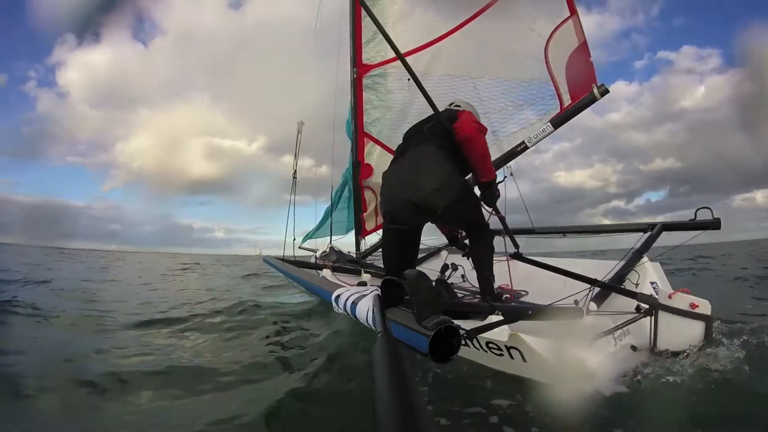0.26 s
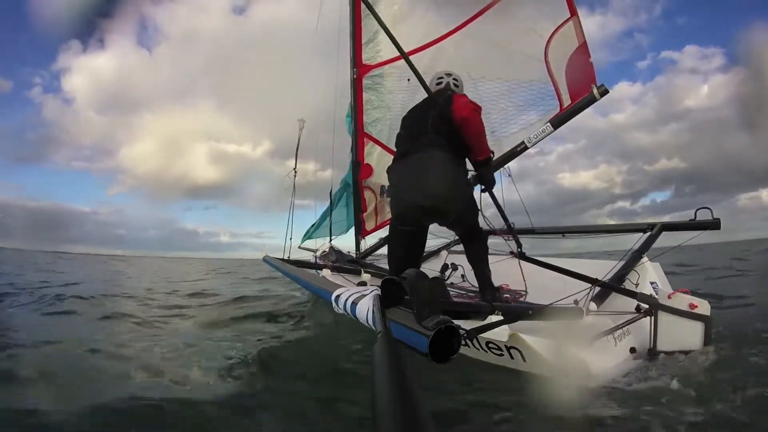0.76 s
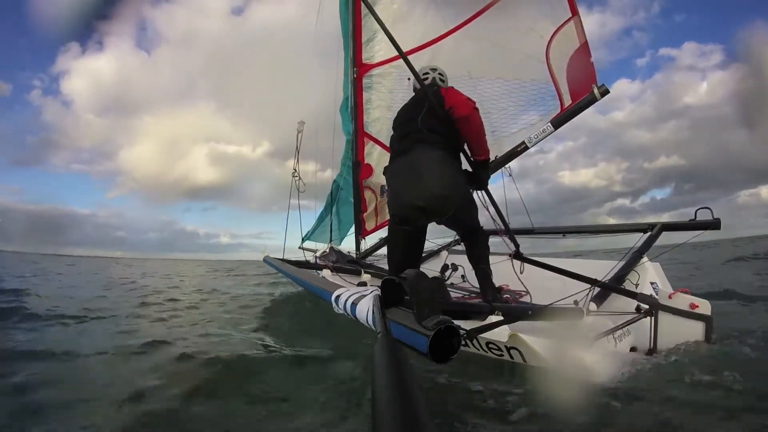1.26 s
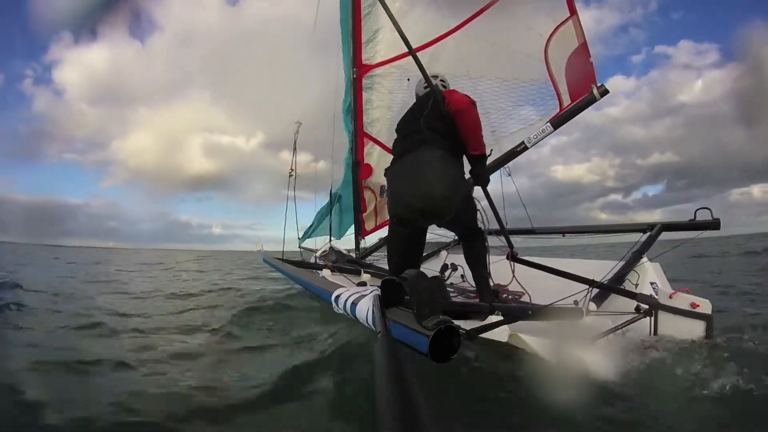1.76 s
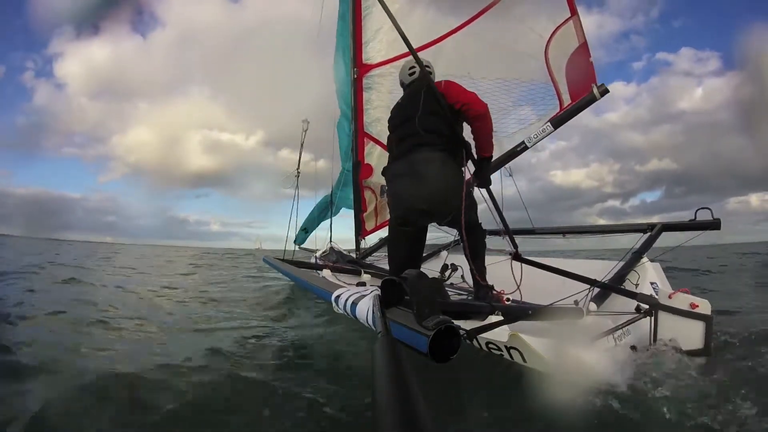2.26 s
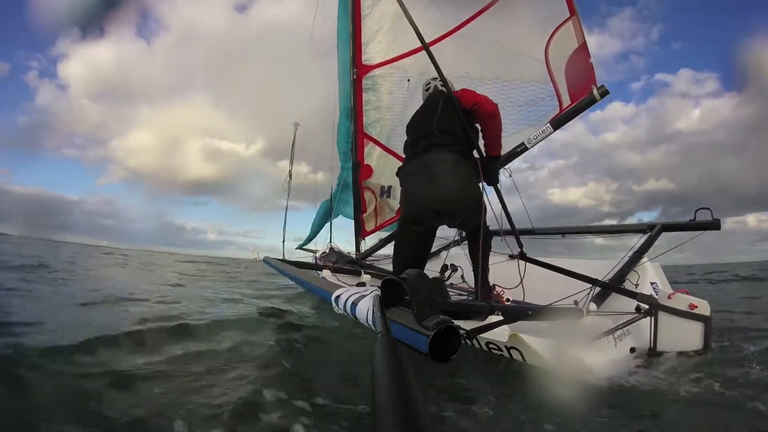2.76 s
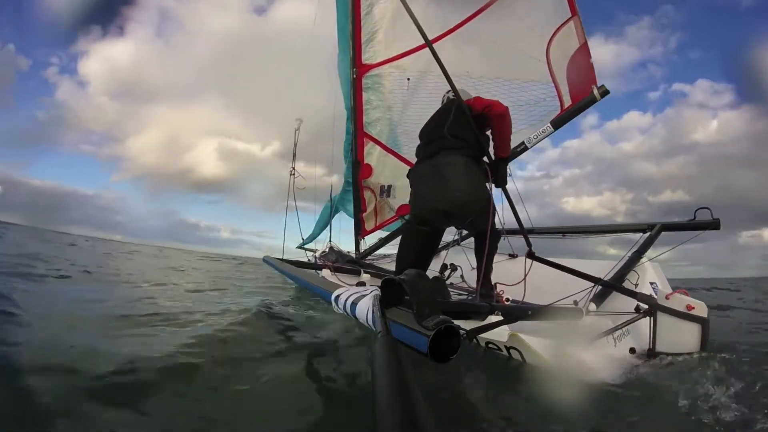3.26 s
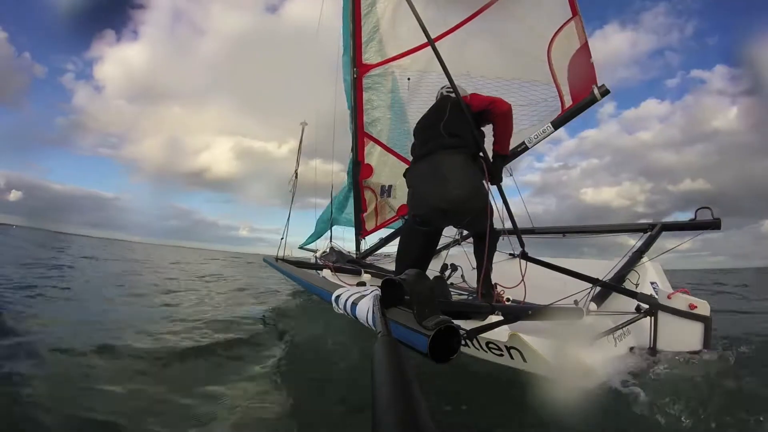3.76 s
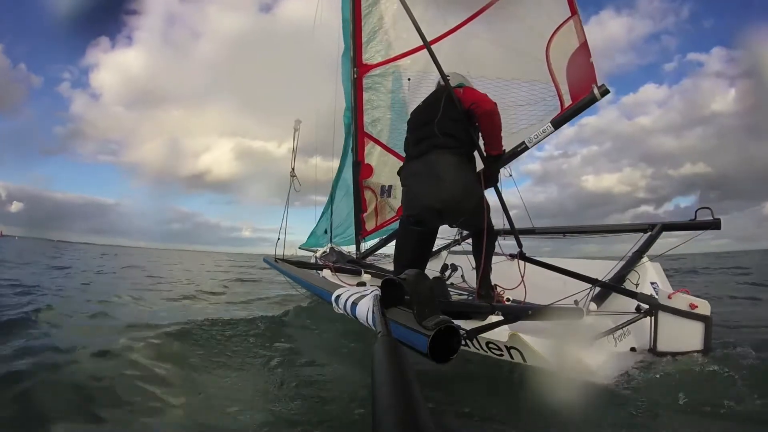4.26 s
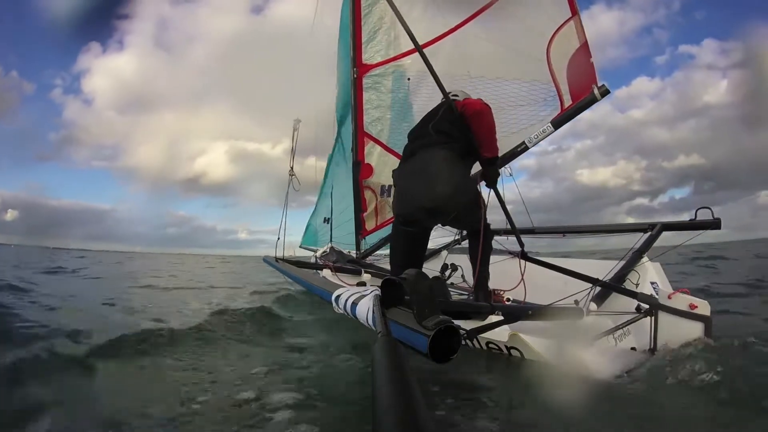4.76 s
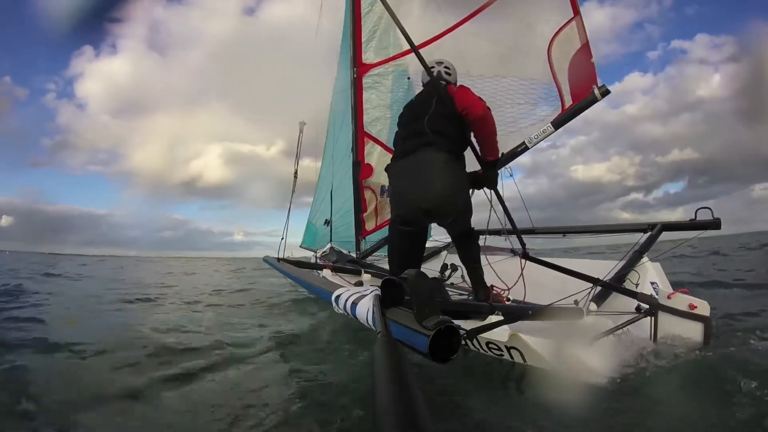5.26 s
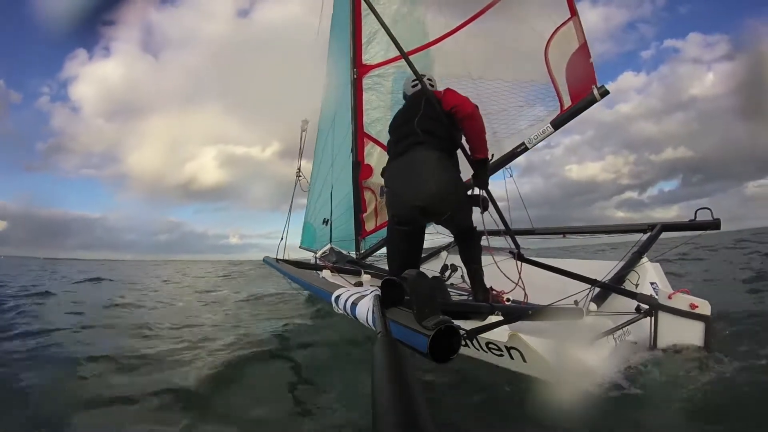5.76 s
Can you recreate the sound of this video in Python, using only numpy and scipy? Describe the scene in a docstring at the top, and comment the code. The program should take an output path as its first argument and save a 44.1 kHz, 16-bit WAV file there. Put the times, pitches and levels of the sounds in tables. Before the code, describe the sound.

Muffled, close and boomy: a low throbbing rumble from wind and jolts on the camera pole dominates. Over it, choppy water knocks and slaps against a hollow hull, with brief watery gushes, small ripples and faint bubbles. Dry clacks of blocks and shackles cut through, loudest at the start and near the end. Two bigger waves bring splashes and fine spray ticking on the housing; open water rushes softly behind.

```python
"""A low throbbing drone, with water washing and slapping along a hollow hull and rigging clacking above.
The place is a small sailing skiff in chop; the microphone is in a sealed camera housing on a stern pole.
The drone is the pole's lowest mode, swayed by wind and jolts; noise bursts through the hull's modes make
the water; struck fittings make the clacks. Twice a fine spray sizzles on the housing, close to the
microphone; bubbles, drops, small ripples and the distant rush of the sea lie behind."""
import sys
import numpy as np
from scipy import signal
from scipy.fft import rfft, irfft, next_fast_len
from scipy.io import wavfile
from scipy.ndimage import uniform_filter1d, map_coordinates

SR = 44100
rng = np.random.default_rng(int(sys.argv[2]) if len(sys.argv) > 2 else 0)


def transcribe(u):
    """Save the signal u as a 16-bit wav file named by the first command-line argument.

    u: samples, shape (n,) or (channels, n), limited to [-1, 1]; the rate is SR.
    q: integer samples, one column per channel.
    """
    v = np.clip(np.atleast_2d(u).T, -1, 1)
    q = np.round(v * 32767).astype(np.int16)
    wavfile.write(sys.argv[1], SR, q)


N = 265923
TIME = np.arange(N) / SR

# Levels in the tables are relative: the functions add trims, slow drift and the microphone's treble loss.
# wind shaking the pole: (time [s], level [dB])
WIND_LEVEL = [(0, -36.5), (0.1, -39.5), (0.52, -31), (0.62, -40), (1.0, -34), (1.2, -37), (1.5, -35.5),
              (1.75, -39.5), (2.1, -35.5), (2.4, -32.5), (2.72, -37.5), (2.95, -35), (3.15, -39),
              (3.95, -41.5), (4.3, -35), (4.42, -48), (4.55, -39.5), (4.8, -40), (5.0, -39.5), (5.4, -31.5),
              (5.7, -38.5), (6.03, -39)]
# gusts and lurches that jolt the pole: (time [s], level [dB], hold [s])
POLE_JOLTS = [(0.08, -21.5, 0.016), (0.167, -24.5, 0.017), (0.274, -27.5, 0.014), (0.44, -32.5, 0.017),
              (0.767, -20.5, 0.023), (0.88, -25, 0.012), (1.485, -29, 0.015), (2.268, -24.5, 0.02),
              (2.352, -22.5, 0.01), (2.526, -21, 0.019), (2.816, -26, 0.06), (3.702, -29, 0.018),
              (4.914, -23.5, 0.017), (5.07, -25.5, 0.022)]
# unpitched buffeting spectrum: (frequency [Hz], density [dB per Hz])
BUFFET_COLOUR = [(8, -22), (20, 4), (42, 0.5), (62, 6.5), (80, -5.5), (100, -25), (200, -32.5), (400, -55),
                 (1000, -120)]
# upper bending modes of the pole: (frequency [Hz], width [Hz], level [dB])
POLE_MODES = [(115.4, 13, 3.5), (150.3, 21.5, 1.5)]
# waves the hull runs through: (time [s], level [dB], hold [s], draining [dB per s], splash [dB re wave])
HULL_WAVES = [(0.622, -52, 0.15, 30, -5.5), (1.195, -54.5, 0.7, 21, -8.5), (1.88, -36.5, 0.085, 25, -2),
              (3.68, -56, 0.12, 49, -18), (5.061, -48, 0.18, 69, 0), (5.188, -44, 0.15, 70, 0)]
# modes of hull and housing: (frequency [Hz], width [Hz], level [dB])
HULL_MODES = [(326, 38, -11), (435, 33, -8.5), (488.2, 30.6, 3), (656, 36, -3), (718, 51, -10.5),
              (838, 32.5, -2), (904, 75, -9.5), (1038, 33, -6), (1133, 93, -3.5), (1460, 200, -7.5),
              (1666, 95, -1), (1785, 39, -3), (2127, 40, -4), (2497, 450, -8), (2720, 127, -2)]
# waves slapping the hull:
# (time [s], level [dB], splash [dB], t60 [s], air pocket [Hz], thud [dB])
HULL_SLAPS = [(0.789, -28.5, -7.5, 0.18, 630, 1), (0.836, -35, -9, 0.23, 860, 13.5),
              (1.1, -44, -20, 0.097, 560, 9), (1.182, -42.5, -6, 0.11, 463, 3),
              (1.229, -37, -5, 0.14, 800, 15), (1.506, -43.5, 5, 0.12, 520, 0),
              (1.864, -22, -5, 0.052, 655, -2), (1.872, -23.5, -16, 0.09, 1070, 2.5),
              (2.022, -25.5, -28, 0.12, 574, 7.5), (2.079, -36.5, -24, 0.44, 725, 13),
              (2.18, -34, -4, 0.092, 659, 0), (2.216, -25.5, -1.5, 0.064, 580, 6),
              (2.385, -29.5, -4, 0.085, 510, -3), (2.523, -30.5, -4, 0.099, 480, 10),
              (2.66, -41, -14, 0.17, 420, 7), (2.828, -31.5, -22, 0.089, 564, -2),
              (3.59, -42.5, -9, 0.049, 420, 0), (3.668, -38.5, 5.5, 0.13, 517, 1),
              (3.728, -45, 3, 0.06, 620, -2), (3.772, -35.5, -5.5, 0.088, 473, 1),
              (3.963, -42.5, -10, 0.074, 487, 11), (4.074, -33.5, -26, 0.1, 440, 4),
              (4.79, -50, 3, 0.06, 480, 11), (4.914, -43, -13, 0.12, 496, -5),
              (5.079, -20, -7.5, 0.077, 647, -4), (5.394, -35, -1.5, 0.15, 479, -7),
              (5.431, -33, -17, 0.13, 544, 3), (5.492, -29.5, -11, 0.062, 466, 4),
              (5.812, -33.5, -21, 0.11, 950, -1), (5.908, -41, -3, 0.026, 500, 10),
              (6.012, -27, -4, 0.11, 525, -4)]
# first contact of a slap, spectrum: (frequency [Hz], level [dB])
CONTACT_COLOUR = [(1500, -34), (2800, 8), (3600, -10), (4500, 5.5), (5200, -9.5), (5800, -7), (9000, -23),
                  (15000, -34)]
# blocks and shackles of the rigging clacking:
# (time [s], level [dB], thud [dB], edge [dB], rattle [dB], fall of the ringing tail [octaves per s])
RIGGING_CLACKS = [(0.0232, -7.5, -4.5, -23, -6.5, 76), (0.0443, -24, 1, -1.5, 3.5, 10.5),
                  (0.28, -41.5, -24, -32, 4, 8.9), (0.5166, -27, -5, -7.5, -2.5, 19),
                  (0.6453, -43.5, 11, 9, 0, 25), (0.6852, -42.5, -11, -17, -3, 20),
                  (0.988, -24.5, -5.5, -10, -0.5, 25), (1.747, -38, 17, -9, 0.5, 33),
                  (2.3157, -39, -9, -14, 3, 30), (2.367, -36, -4, -2, -1, 18), (2.386, -29, -5, -14, 2, 20),
                  (2.501, -36, -1, -6, 3, 31), (2.592, -36.5, -3, -28, -3.5, 48),
                  (2.8117, -27.5, -2, -13, -3, 48), (2.827, -32, -2, -11, 2, 70),
                  (2.860, -32, 0, -10, -1, 20), (2.876, -24, -7, -9, -1, 17), (3.3281, -33, -7, -11, 7, 20),
                  (3.8462, -36, 2, -7, -1.5, 50), (4.039, -42.5, -8, -17, 3, 20),
                  (4.258, -43.5, -7, -12, 5, 18), (5.284, -30.5, -5, -25, -7, 20),
                  (5.6283, -41, 4, -2, -2, 35), (5.807, -19, 0.5, -24, -5.5, 75)]
# broad spectrum of a clack: (frequency [Hz], level [dB])
CLACK_SPECTRUM = [(100, -42), (220, -44), (330, -18), (1700, -23.5), (2020, -38), (2400, -21.5),
                  (2950, -26), (4300, -43.5), (9000, -67)]
# what the fittings ring with: (frequency [Hz], half width [Hz], level [dB])
FITTING_MODES = [(482, 44, -10), (650, 29, -15.5), (1040, 97, -19), (1160, 104, -11.5), (1315, 28, -15),
                 (1486, 79, -5), (1662, 106, -0.5), (1808, 94, -1.5), (2136, 84, -13), (2380, 150, -22.5),
                 (2765, 114, -17), (3120, 130, -33.5), (3450, 43, -29), (4130, 59, -60)]
# single bubbles in the wake: (time [s], level [dB], starting pitch [Hz])
WAKE_BUBBLES = [(0.565, -46.5, 1430), (0.718, -48, 2040), (0.92, -50, 1860), (1.09, -54, 1510),
                (1.476, -53, 2100), (3.952, -49, 2110)]
# sheets of spray thrown by the two big waves: (time [s], level [dB], hold [s])
SPRAY_SHEETS = [(1.855, -62, 0.14), (5.055, -67, 0.36)]
# small drops on the housing: (time [s], level [dB])
HOUSING_DROPS = [(0.332, -59), (0.684, -58), (0.7033, -58), (0.785, -60), (0.826, -59), (2.2188, -56),
                 (3.054, -65), (5.083, -67), (5.63, -62)]
# thin shell of the housing: (frequency [Hz], width [Hz], level [dB])
SHELL_MODES = [(7400, 630, 5), (11050, 1500, -0.5), (12050, 300, 4), (13300, 400, -21), (14600, 790, -23)]
# rush of open water and wind, spectrum: (frequency [Hz], density [dB per Hz])
SEA_COLOUR = [(110, -31), (180, -2.5), (308, -6), (357, -6), (480, -2), (546, -7.5), (645, -9.5),
              (1400, -13), (1790, -14), (1960, -14.5), (2680, -17.5), (3610, -23), (15000, -42)]
# the wake streaming off the stern: (time [s], level [dB], fizz level [dB])
WAKE_LEVELS = [(0, -55, -63), (0.6, -57, -58.5), (1.3, -57, -64), (2.9, -58.5, -60.5), (3.1, -58.5, -66),
               (3.5, -58, -64.5), (3.9, -56.5, -60), (4.4, -58, -70.5), (4.6, -57, -62), (4.95, -56, -61.5),
               (5.6, -57, -62.5), (6.03, -54, -72)]

# pole: slopes of jolts and thumps, then its sway and the beat of two swing planes slightly out of tune
JOLT_RISE_DB_PER_S, JOLT_FALL_DB_PER_S, THUMP_FALL_DB_PER_S = 432, 237, 119
SWAY_HZ, SWAY_WANDER_HZ, FLUTTER_DB = 55.8, 3.67, 1
BEAT_HZ, BEAT_WANDER_HZ, BEAT_DEPTH = 8.2, 2.04, 0.67
SWAY_DB, BUFFET_DB = -3.5, -6  # beside the wind level
THUMP_DB, CLACK_THUMP_DB = -21, -4.5  # upper modes after a blow; clacks stir them less
UPPER_WIND_DB, UPPER_WAVE_DB = -20.5, -7.5  # wind and waves stir the upper modes
UPPER_DRAINS = 0.6  # share of the draining rate: the upper modes outlast the churn

# water
WAVE_RISE_DB_PER_S, SPLASH_RISE_DB_PER_S = 168, 294  # splash bursts out faster than churn builds
SPLASH_DRAINS = 2.7  # how much faster the splash dies than the churn
HULL_SHIFT = 0.021  # usual swing of the modes as water presses on the hull, in log pitch
SLAP_ATTACK_SHARE = 0.016  # of its t60: long slaps start softly
SLAP_DIRECT_DB = -15  # the part of a slap that passes between the hull's modes
POCKET_DB, POCKET_WIDTH = 8, 0.21  # air pocket resonance; width in log pitch
CRACK_DB, CRACK_T60_S = -16.5, 0.029  # first contact, beside the slap's splash
RIPPLE_DB, RIPPLE_SPREAD_DB, RIPPLE_HZ, RIPPLE_RISE_S = -52.5, 5, 900, 0.011
SPRAY_EDGE_DB_PER_S = 800  # spray sets in and stops abruptly
SIZZLE_PULSE_HZ, SIZZLE_PULSE_DEPTH = 85, 0.4

# rigging
RATTLE_RISE_S, RATTLE_T60_S = 0.0022, 0.05
ONSET_NOISE_DB, ONSET_NOISE_S = -21, 0.008  # faint noise around the strike, softening its onset
TAIL_DB, TAIL_T60_S, TAIL_HZ, TAIL_RISE_S = -12, 0.05, 1900, 0.0031  # faint ring; pitch at its start

TOP_HZ = 15250  # band limit at the microphone


def pole():
    """Wind and jolts sway and beat the pole's lowest mode amid buffeting; blows stir its upper modes."""
    wind = amp(curves(WIND_LEVEL)[0])
    phase = 2 * np.pi * np.cumsum(SWAY_HZ + SWAY_WANDER_HZ * wobble(24.19)) / SR
    beat = 2 * np.pi * np.cumsum(BEAT_HZ + BEAT_WANDER_HZ * wobble(8.5)) / SR
    flutter = unit((1 + BEAT_DEPTH * np.sin(beat)) * amp(FLUTTER_DB * wobble(17)))
    jolts = [swell(s, db, hold, JOLT_RISE_DB_PER_S, JOLT_FALL_DB_PER_S) for s, db, hold in POLE_JOLTS]
    drive = together([wind * flutter] + jolts)
    sway = amp(SWAY_DB) * drive * unit(np.sin(phase))

    buffet = unit(filtered(rng.standard_normal(N), colour(BUFFET_COLOUR)))
    buffeting = amp(BUFFET_DB) * wind * buffet

    upper_band = lambda f: resonances(POLE_MODES)(f) * above(f, 74) * (1 - above(f, 181))
    upper = unit(filtered(rng.standard_normal(N), upper_band))
    blows = [(s, db + thud_db) for s, db, *_, thud_db in HULL_SLAPS]
    blows += [(s, db + thud_db + CLACK_THUMP_DB) for s, db, thud_db, *_ in RIGGING_CLACKS]
    thumps = [swell(s, db + THUMP_DB, 0.0049, JOLT_RISE_DB_PER_S, THUMP_FALL_DB_PER_S) for s, db in blows]
    stir = together([amp(UPPER_WIND_DB) * wind, amp(UPPER_WAVE_DB) * flow(UPPER_DRAINS)] + thumps)
    return sway + buffeting + stir * upper


def wash():
    """Heavy churning water drives the hull's low modes, lighter and coarser splashes its high ones."""
    hull = resonances(HULL_MODES)
    churn_band = lambda f: hull(f) * above(f, 230) * (1 - above(f, 930))
    churn = filtered(patter(rate=6500, spread_db=0.5), churn_band)

    splash_top = lambda f: 1 - above(f, 2370) + amp(-25) * (1 - above(f, 6000))
    splash = filtered(patter(rate=2800, spread_db=1.5), lambda f: hull(f) * above(f, 520) * splash_top(f))
    splashing = together([swell(s, db + splash_db, hold, SPLASH_RISE_DB_PER_S, SPLASH_DRAINS * fall)
                          for s, db, hold, fall, splash_db in HULL_WAVES])

    lapping = amp(0.34 * wobble(25))
    churned = amp(-2.5) * flow() * patchy(churn, depth_db=1.5)
    return lapping * (churned + splashing * patchy(splash, depth_db=0.2))


def slaps():
    """A wave face cracks against the hull and traps air: a short noise burst rings pocket and hull."""
    out, t = np.zeros(N), np.arange(SR // 4) / SR
    crack_ring = causal(colour(CONTACT_COLOUR))
    for s, db, splash_db, t60, pocket_hz, thud_db in HULL_SLAPS:
        hull = hull_pressed(rng.uniform(-0.82, 1))
        attack = 1 - np.exp(-t / (SLAP_ATTACK_SHARE * t60))
        burst = rng.standard_normal(len(t)) * amp(-60 * t / t60) * attack

        pocket_db = lambda f: POCKET_DB * np.exp(-(np.log((f + 1) / pocket_hz) / POCKET_WIDTH) ** 2)
        body_db = lambda f: 0.98 * thud_db * (1 - above(f, 354)) + splash_db * above(f, 1200)
        dulling_db = lambda f: -21 * above(f, 2980) - 16 * above(f, 7000)
        tone = lambda f: amp(pocket_db(f) + body_db(f) + dulling_db(f))
        direct = lambda f: amp(SLAP_DIRECT_DB) * (1 - above(f, 1200))
        ring = causal(lambda f: np.hypot(np.abs(hull(f)), direct(f)) * above(f, 278) * tone(f))
        add(out, s - 0.001, signal.fftconvolve(burst, ring), db)

        crack = rng.standard_normal(len(t)) * amp(-60 * t / CRACK_T60_S) * (1 - np.exp(-t / 0.0029))
        add(out, s, signal.fftconvolve(crack, crack_ring), db + splash_db + CRACK_DB)
    return out


def clacks():
    """Fittings strike, rattle and ring; bending waves bring the highs down the pole first."""
    out, t = np.zeros(N), np.arange(SR // 6) / SR - 0.02  # the strike is at t = 0
    after = np.maximum(t, 0)
    peaks = lambda f: sum(amp(db) * np.exp(-((f - hz) / width) ** 2) for hz, width, db in FITTING_MODES)
    fitting = lambda f: colour(CLACK_SPECTRUM)(f) + peaks(f)
    dispersion = lambda f: np.exp(-2j * np.pi * 0.25 * np.sqrt(f))  # delays by 0.125 / sqrt(f) s
    for s, db, thud_db, edge_db, rattle_db, fall in RIGGING_CLACKS:
        rattle_gain = amp(-60 * after / RATTLE_T60_S) * (1 - np.exp(-after / RATTLE_RISE_S))
        rattle = rng.standard_normal(len(t)) * rattle_gain
        onset_noise = rng.standard_normal(len(t)) * np.exp(-np.abs(t) / ONSET_NOISE_S)
        force = amp(rattle_db) * rattle / np.linalg.norm(rattle)
        force += amp(ONSET_NOISE_DB) * onset_noise / np.linalg.norm(onset_noise)
        force[np.searchsorted(t, 0)] += 1  # the strike itself

        tone_db = lambda f: (thud_db + 4.5) * (1 - above(f, 1650)) + (edge_db + 15.5) * above(f, 2400)
        ring = causal(lambda f: fitting(f) * amp(tone_db(f)))
        blow = signal.fftconvolve(force, ring)[:len(t)]
        add(out, s + t[0] - 0.002, filtered(blow, dispersion), db)

        phase = 2 * np.pi * np.cumsum(TAIL_HZ * 2 ** (-fall * after)) / SR + rng.uniform(0, 2 * np.pi)
        tail_gain = amp(-60 * after / TAIL_T60_S) * (1 - np.exp(-after / TAIL_RISE_S)) ** 2
        add(out, s + t[0], np.sin(phase) * tail_gain, db + TAIL_DB + min(rattle_db, 0))
    return out


def spray():
    """Fine spray sizzles in quick pulses on the housing's shell at the big waves; single drops tick on it."""
    sizzle_band = lambda f: resonances(SHELL_MODES)(f) * above(f, 4600)
    sizzle = filtered(patter(rate=6300, spread_db=2.5), sizzle_band)
    thrown = together([swell(s, db, hold, SPRAY_EDGE_DB_PER_S, SPRAY_EDGE_DB_PER_S)
                       for s, db, hold in SPRAY_SHEETS])
    pulse_phase = 2 * np.pi * np.cumsum(SIZZLE_PULSE_HZ * (1 + 0.25 * wobble(26))) / SR
    pulsing = 1 + SIZZLE_PULSE_DEPTH * np.sin(pulse_phase)
    out = thrown * unit(pulsing * sizzle)

    t = np.arange(SR // 50) / SR
    tick = colour([(1500, -21), (4000, -10), (7300, -1.0), (9000, -13), (12000, -11), (15000, -22)])
    for s, db in HOUSING_DROPS:
        splat = rng.standard_normal(len(t)) * t * amp(-60 * t / 0.004)
        add(out, s, filtered(splat, tick), db + 9.5)
    return out


def ripples(count=90):
    """Wavelets lap at the hull, each a soft noise burst exciting its own part of the hull's range."""
    out, t = np.zeros(N), np.arange(SR // 8) / SR
    times = (np.arange(count) + rng.random(count)) * N / SR / count
    for s, (pitch, size, shift) in zip(times, rng.uniform(-1.16, 1, (count, 3))):
        hull = hull_pressed(2 * shift)
        centre_hz = RIPPLE_HZ * np.exp(0.9 * pitch)
        lap = rng.standard_normal(len(t)) * t * np.exp(-t / RIPPLE_RISE_S)
        band = lambda f: hull(f) * np.exp(-(np.log((f + 1) / centre_hz) / 0.65) ** 2)
        add(out, s, filtered(lap, band), RIPPLE_DB + RIPPLE_SPREAD_DB * size)
    return out


def bubbles():
    """Small bubbles plip faintly in the wake, each a short decaying tone."""
    out = np.zeros(N)
    for s, db, hz in WAKE_BUBBLES:
        add(out, s, plip(hz, rise=0.02), db)
    return out


def sea():
    """The rush of open water and wind, as dulled noise, with the restless fizz of the wake."""
    level_db, fizz_db = curves(WAKE_LEVELS)
    rush = unit(filtered(rng.standard_normal(N), colour(SEA_COLOUR)))
    low_rush = filtered(rush, lambda f: 1 - above(f, 3270))
    fizz_band = lambda f: resonances(HULL_MODES)(f) * above(f, 1250) * (1 - above(f, 2430))
    fizz = filtered(patter(rate=700, spread_db=3), fizz_band)

    wake = amp(level_db + 1.7 * wobble(6.8)) * patchy(low_rush, depth_db=1.94)
    fizzing = amp(fizz_db + 2.0 * wobble(11)) * patchy(fizz, depth_db=2)
    hiss = amp(-53.0 + 0.33 * wobble(5.46)) * (rush - low_rush)
    return wake + fizzing + hiss


def flow(drains=1):
    """Gain of the water along the hull: each wave builds, holds and drains away."""
    return together([swell(s, db, hold, WAVE_RISE_DB_PER_S, drains * fall)
                     for s, db, hold, fall, _ in HULL_WAVES])


def hull_pressed(shift):
    """The hull's response with its modes moved by shift times their usual swing."""
    return resonances([(hz * np.exp(HULL_SHIFT * shift), width, db) for hz, width, db in HULL_MODES])


def plip(hz, rise):
    """A bubble rings for a few cycles while its pitch rises."""
    cycles = hz * np.arange(SR // 16) / SR
    life = 1 - np.exp(-cycles / 10)
    return np.sin(2 * np.pi * cycles * (1 + rise * life)) * (1 - life) * (1 - np.exp(-cycles / 3))


def patchy(x, depth_db):
    """The wetted area keeps shifting, so each band swells and fades by itself; rms 1."""
    z = signal.stft(x, nperseg=1024)[2]
    across_bands = uniform_filter1d(rng.standard_normal(z.shape), size=5, axis=0)
    field = uniform_filter1d(across_bands, size=3, axis=1)
    return unit(signal.istft(z * amp(depth_db * unit(field)), nperseg=1024)[1][:N])


def patter(rate, spread_db):
    """Tiny random impacts of unequal size, rate a second on average; rms 1."""
    hits = rng.random(N) < rate / SR
    return unit(hits * rng.standard_normal(N) * amp(spread_db * rng.standard_normal(N)))


def swell(s, db, hold, rise, fall):
    """Gain that rises to db at time s, holds and falls; slopes in dB per second."""
    return amp(db - rise * np.maximum(s - TIME, 0) - fall * np.maximum(TIME - s - hold, 0))


def together(gains):
    """Joint gain of unrelated sources: their powers add."""
    return np.sqrt(np.sum(np.square(gains), axis=0))


def resonances(modes):
    """Causal response of (Hz, width, dB) modes, with notches between them."""
    return lambda f: sum(amp(db) * 1j * f * w / (c * c - f * f + 1j * f * w) for c, w, db in modes)


def causal(response, size=4096):
    """The minimum-phase ring with this magnitude, by folding the cepstrum onto positive time."""
    cepstrum = irfft(np.log(np.abs(response(np.fft.rfftfreq(size, 1 / SR))) + 1e-6))
    cepstrum[1:size // 2] *= 2
    cepstrum[size // 2 + 1:] = 0
    return irfft(np.exp(rfft(cepstrum)))


def filtered(x, response):
    """x times a complex response of frequency."""
    size = next_fast_len(len(x) + SR // 4)
    return irfft(rfft(x, size) * response(np.fft.rfftfreq(size, 1 / SR)), size)[:len(x)]


def colour(points):
    """Response through (Hz, dB) points on a log axis."""
    hz, db = np.transpose(points)
    return lambda f: amp(np.interp(np.log(f + 1), np.log(hz), db))


def above(f, edge_hz):
    """Weight from 0 below a soft edge to 1 above it."""
    return 1 - 1 / (1 + (f / edge_hz) ** 8)


def wobble(rate):
    """A smooth random curve, rate knots a second."""
    return map_coordinates(rng.standard_normal(int(N * rate / SR) + 4), [TIME * rate])


def curves(rows):
    """One value per sample for each column after the time."""
    s, *cols = np.transpose(rows)
    return [np.interp(TIME, s, c) for c in cols]


def amp(db):
    """Decibels to gain."""
    return 10 ** (np.asarray(db) / 20)


def unit(x):
    """Scaled to rms 1."""
    return x / np.sqrt(np.mean(x ** 2) + 1e-20)


def add(track, s, sound, db):
    """Mix in a sound starting at time s with a peak of db."""
    part = track[max(round(s * SR), 0):][:len(sound)]
    part += amp(db) * sound[:len(part)] / np.abs(sound).max()


def scene():
    """Everything that reaches the one microphone."""
    return (pole() + wash() + slaps() + clacks() + spray() + ripples() + bubbles() + sea())[None]


def record(dry):
    """The camera microphone's treble drops 5 dB around 11.9 kHz and ends at its band limit."""
    response = lambda f: amp(-5 * above(f, 11900)) * (f < TOP_HZ)
    return np.array([filtered(channel, response) for channel in dry])


dry = scene()
out = record(dry)
transcribe(out)
```